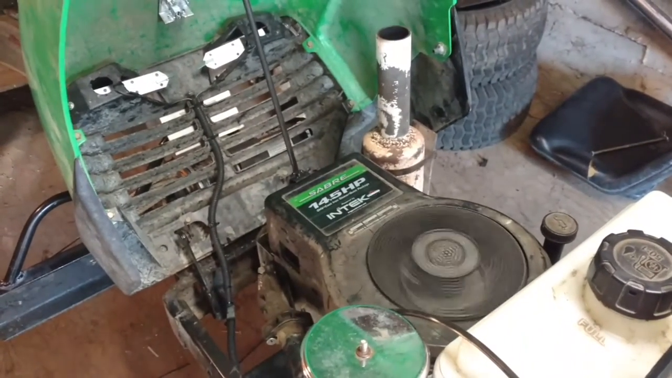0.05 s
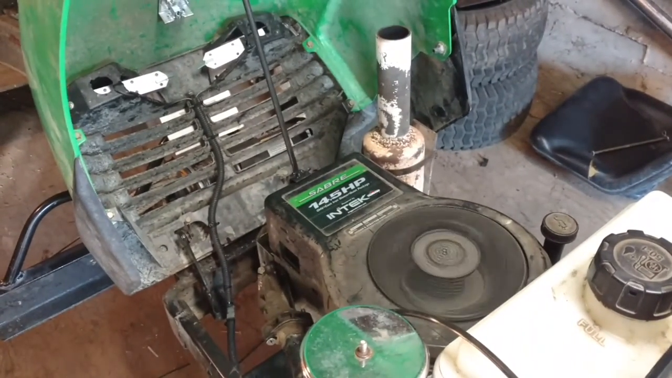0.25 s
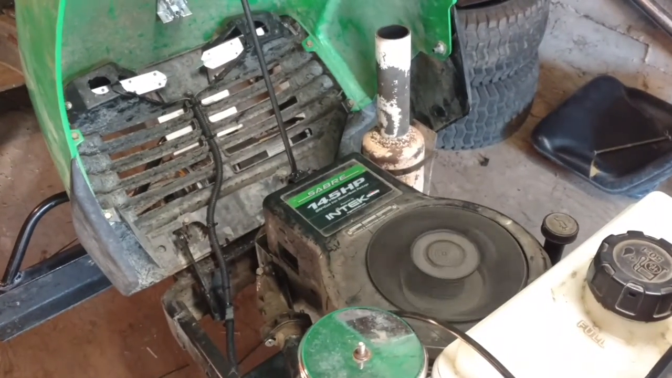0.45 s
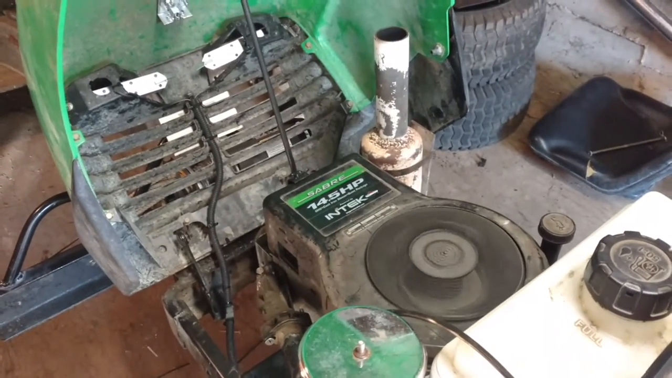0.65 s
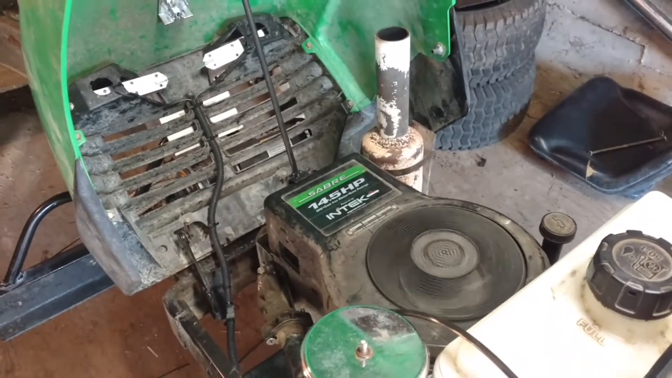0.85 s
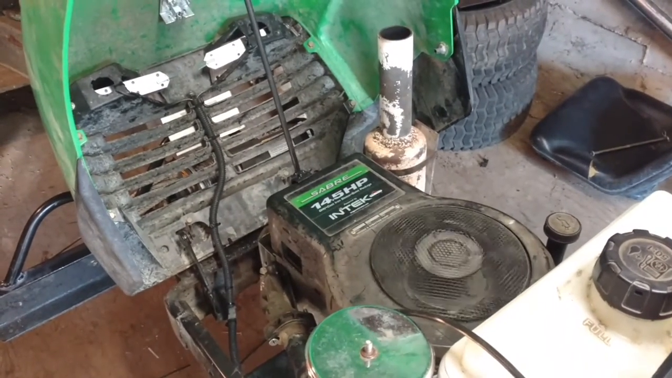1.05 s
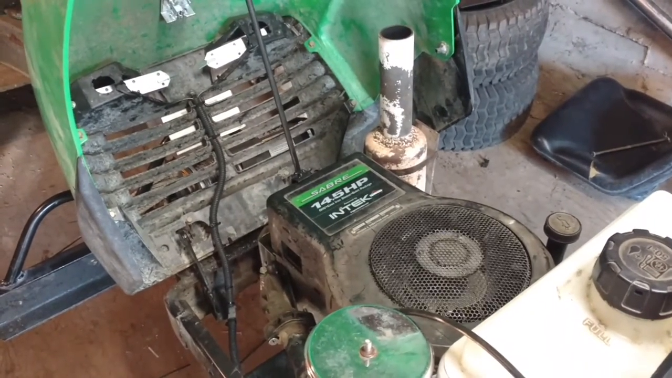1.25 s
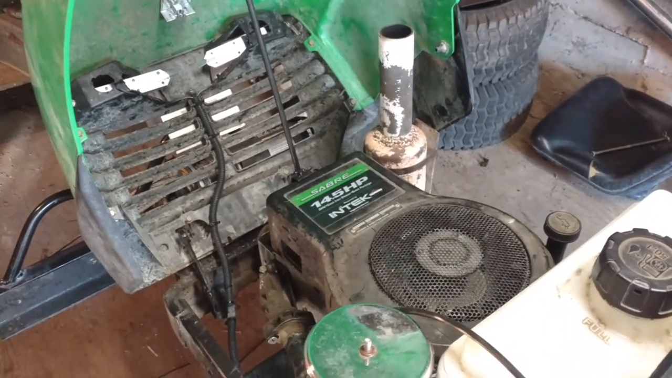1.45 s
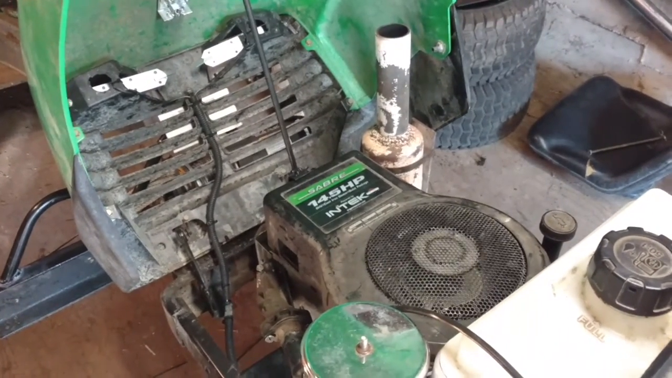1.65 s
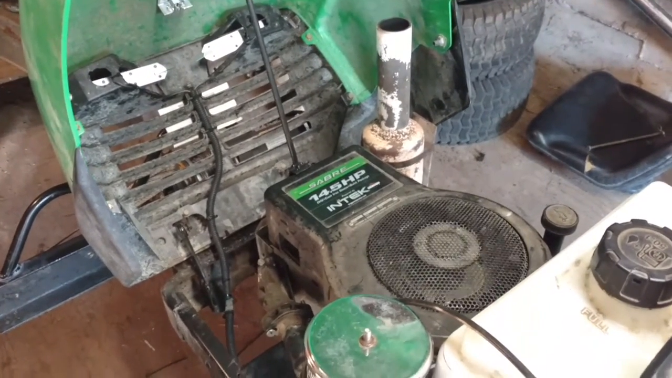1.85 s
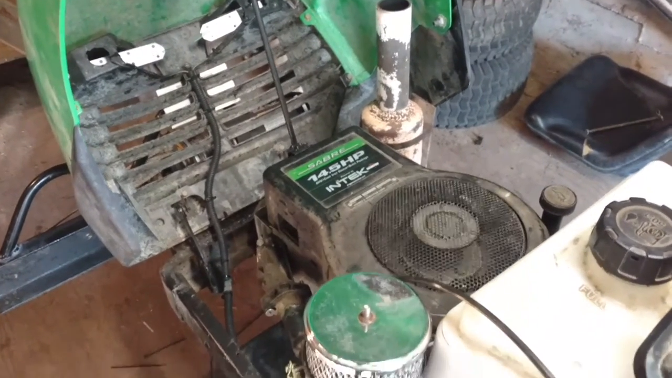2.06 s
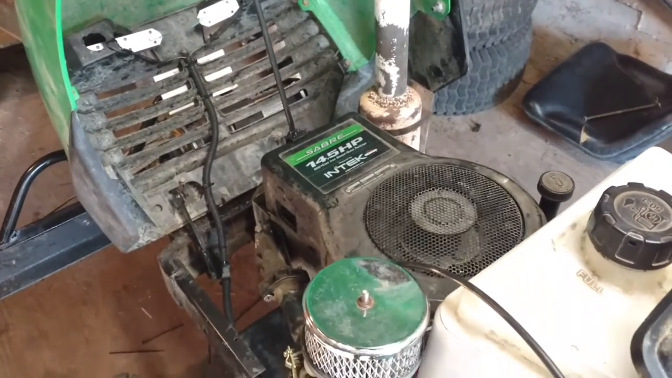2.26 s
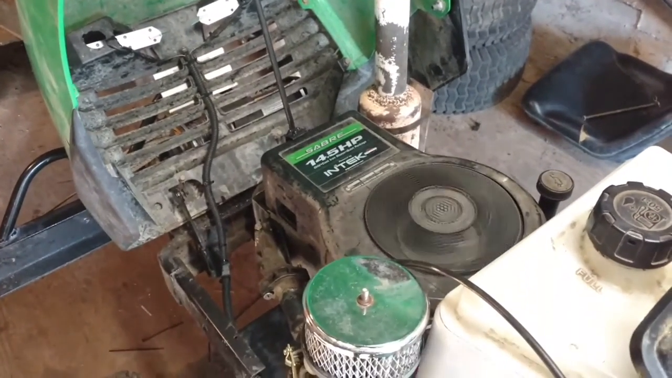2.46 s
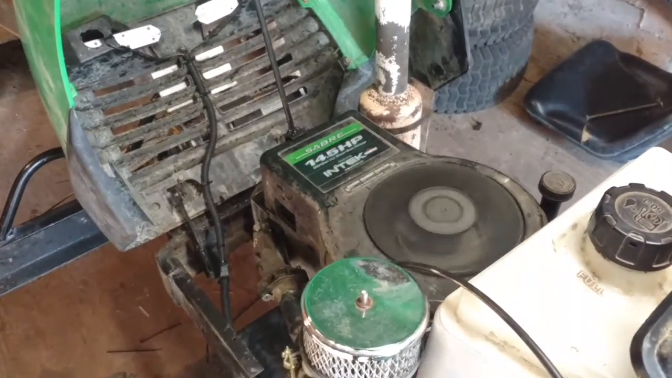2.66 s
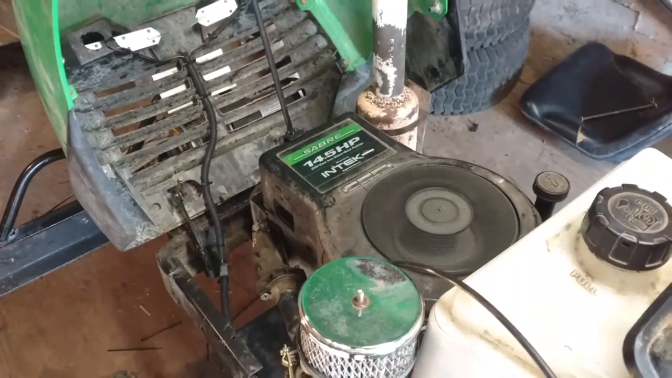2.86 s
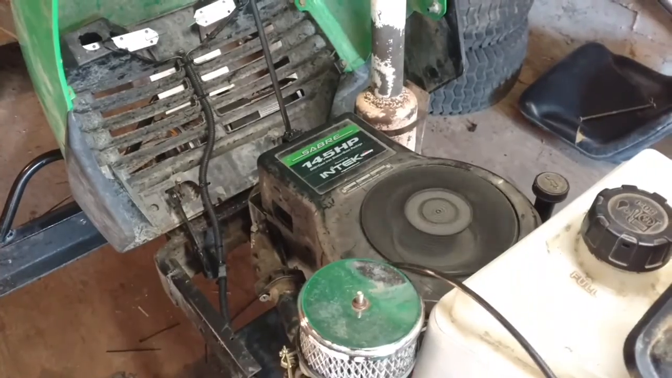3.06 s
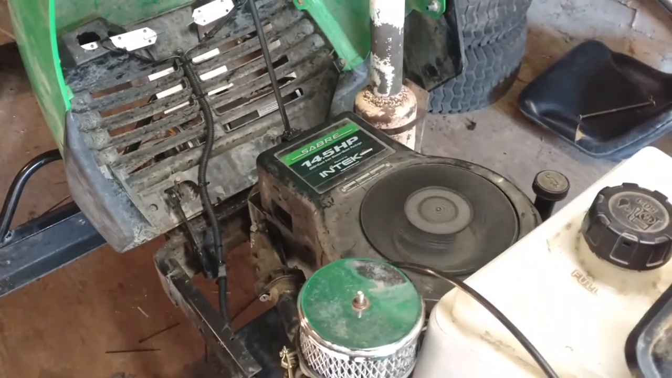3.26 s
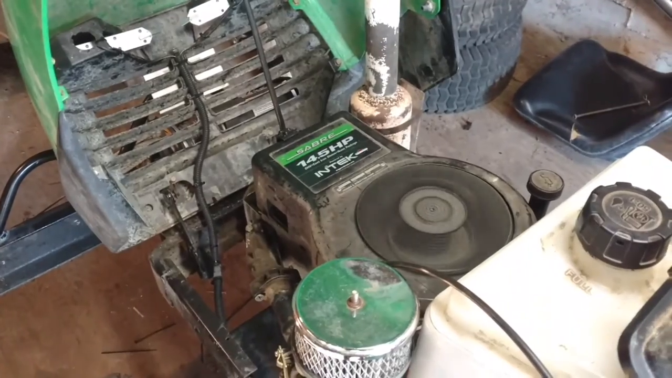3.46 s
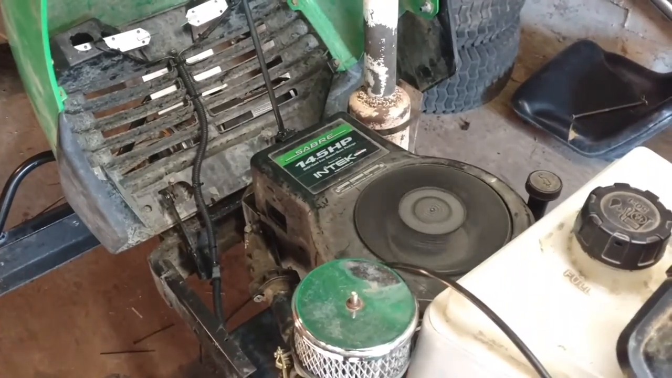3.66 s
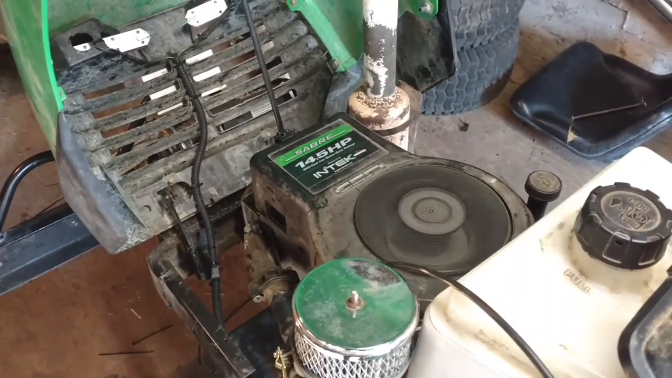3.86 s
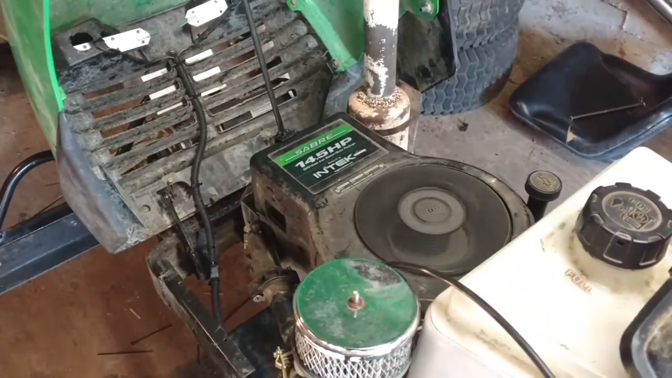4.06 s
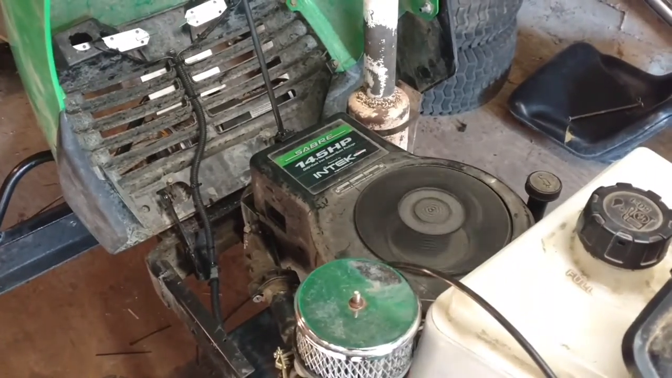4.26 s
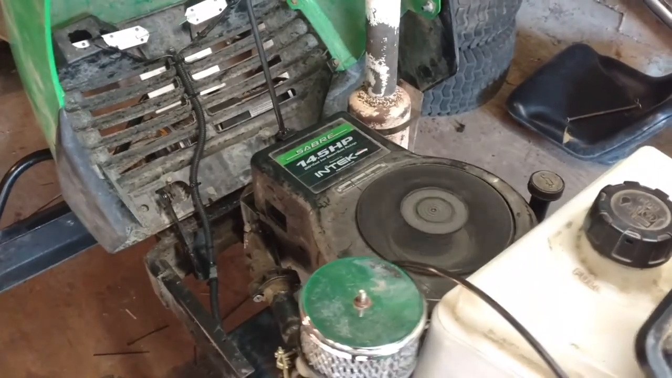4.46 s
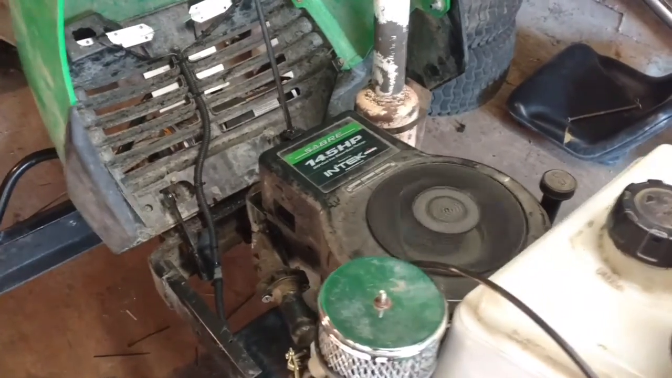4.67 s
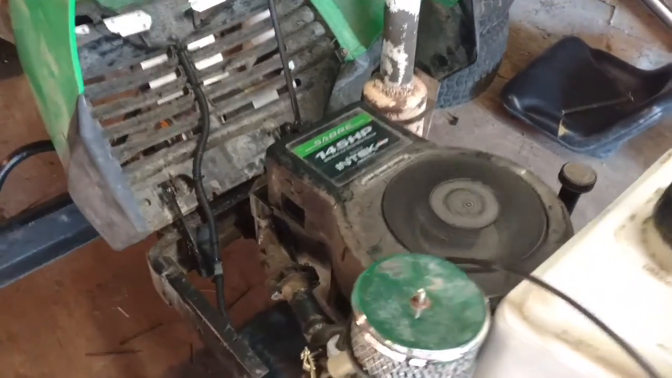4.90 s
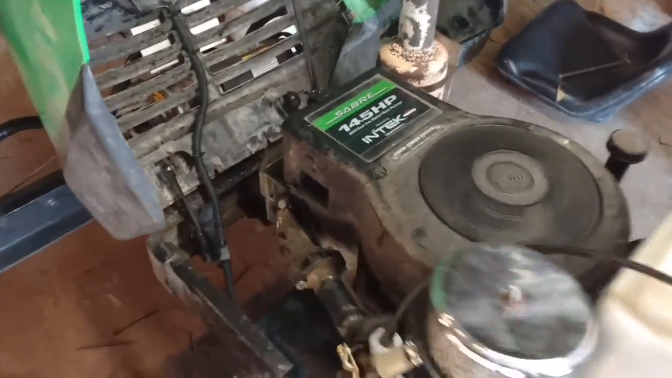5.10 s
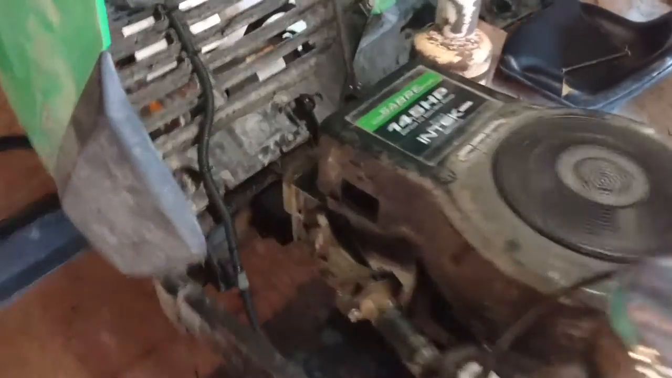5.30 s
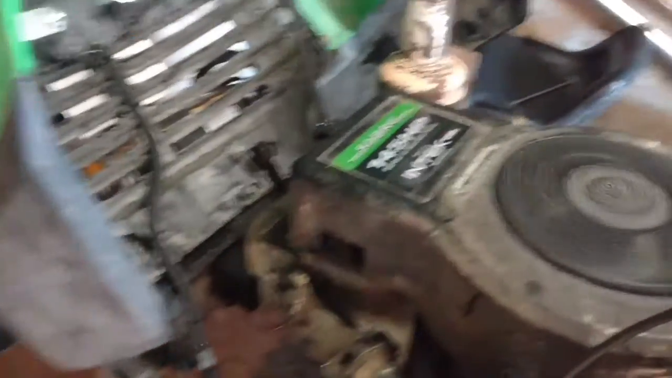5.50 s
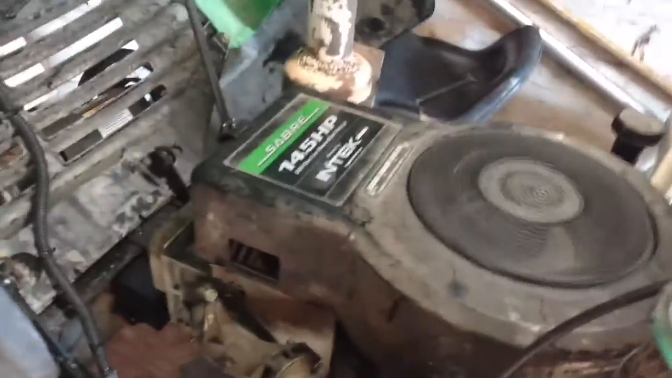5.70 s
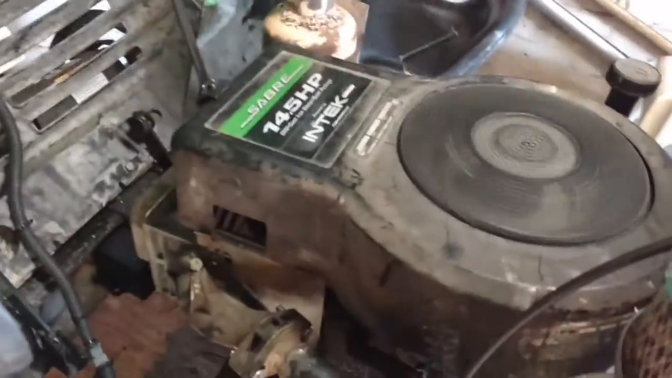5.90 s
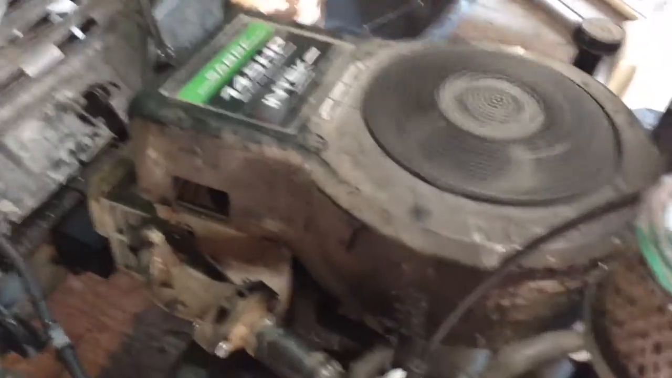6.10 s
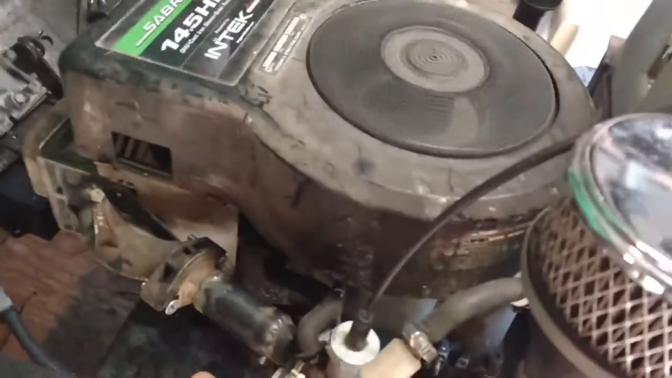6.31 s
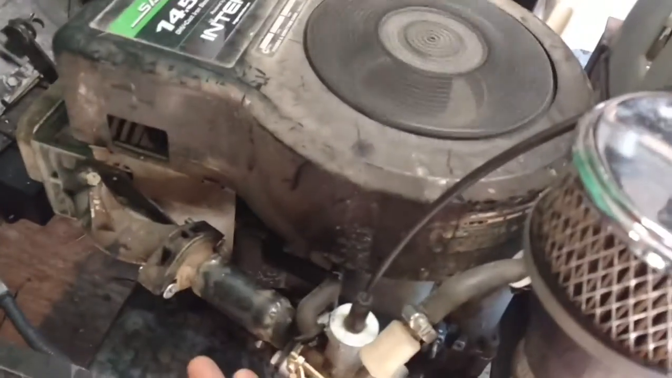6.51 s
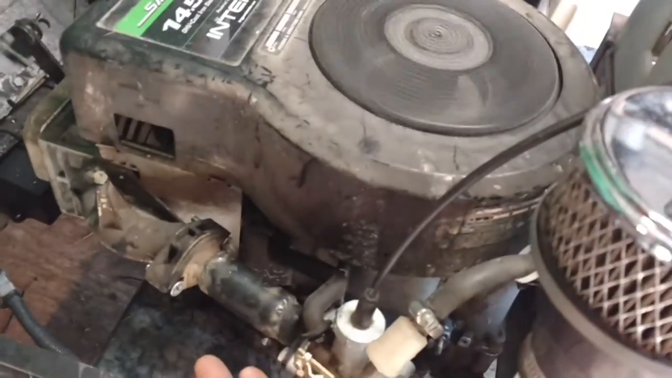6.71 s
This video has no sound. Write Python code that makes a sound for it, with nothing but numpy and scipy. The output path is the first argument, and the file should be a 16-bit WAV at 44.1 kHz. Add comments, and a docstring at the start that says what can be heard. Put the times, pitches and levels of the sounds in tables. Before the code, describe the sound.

Harsh gear grinding with one exhaust cough gives way to a loose rattle, airy sighs and faint knocks. A solenoid slams, the motor whines against compression, then cranks again until firing begins. Hard, cracking, hooting exhaust pulses settle into a lumpy idle, with valve ticks growing clearer as the microphone moves nearer. Close stereo, short reflections from a hard-walled garage.

```python
"""Gears grind over faint room tone: a cold single-cylinder mower engine is cranked in a garage, heard from above.
It coughs, throws the pinion out and coasts to a stop. On the second try the solenoid clacks, the starter stalls
with a whine and cranks again; the engine catches and settles to a slow, uneven beat.
Gears are tooth impacts plus mesh tones; metal is ringing modes; exhaust is gliding tones and noise bursts;
air and clatter are coloured noise that follows the four strokes; walls and bonnet are noise echoes."""
import sys
import numpy as np
from scipy import signal
from scipy.fft import rfft, irfft, next_fast_len
from scipy.io import wavfile
from scipy.ndimage import uniform_filter1d, map_coordinates

SR = 44100
rng = np.random.default_rng(int(sys.argv[2]) if len(sys.argv) > 2 else 0)


def pcm_store(signal):
    """Save signal as 16-bit PCM."""
    levels = np.round(np.clip(np.atleast_2d(signal), -1, 1) * 32767)
    wavfile.write(sys.argv[1], SR, levels.astype(np.int16).T)


N = 297498
T = np.arange(N) / SR

# Table levels and the *_DB settings are relative: the functions add their own trims.
# Room rush spectrum: freq_hz, density_db
GARAGE_SPECTRUM = [(25, -31), (60, -23), (120, -19.5), (250, -5), (400, -14), (700, -9), (1300, -12),
                   (2500, -21.5), (6000, -25), (15000, -36.5)]
# Room hum tones: freq_hz, level_db
ROOM_HUM = [(398.4, -72), (468.3, -73), (667.5, -68.5), (829.0, -71), (888.2, -75.5)]
# Wall reverberation: freq_hz, t60_s
WALL_DECAY = [(100, 0.45), (400, 0.49), (700, 0.31), (1300, 0.28), (3000, 0.18), (14000, 0.19)]

# Starter turns the engine: break_free_s, key_release_s, level_db
CRANKS = [(-.1, 0.594, 0), (2.37, 3.09, -0.5)]
# Gear whine partials: mesh_rate_multiple, level_db
MESH_ORDERS = [(1, 0), (2, -1), (3, -13.5), (4, -20), (5, -16)]
# Gear grind spectrum: freq_hz, density_db
GRIND_SPECTRUM = [(40, -61.5), (150, -11.5), (300, -8), (420, -6.5), (660, -0.5), (1000, 1.5), (1400, 1),
                  (1950, 1), (2600, -38.5), (4000, -35.5), (8000, -73)]
# Dry-tooth scrape spectrum: freq_hz, density_db
SCRAPE_SPECTRUM = [(800, -39), (2000, -1.5), (3000, -1), (4400, -0.5), (6000, 2.5), (7800, -10.5),
                   (10000, -4.5), (12000, -11.5), (15000, -24)]
# Engine cover modes: freq_hz, width_hz, level_db
SHROUD_MODES = [(529.3, 9.9, 6.5), (665.4, 34, 4.5), (758, 37, 0.5), (990, 25, 3), (1220, 46, -20),
                (1723, 49, -5.5), (1923, 57, -5)]
# Flywheel and ring gear modes: freq_hz, level_db, t60_s
FLYWHEEL_MODES = [(256.4, -18.5, .55), (375, -8.5, 0.16), (658, -7, 0.54), (775, -1, 0.14),
                  (981, -1.5, .34), (1180, -11, .45), (1244, -10.5, .4), (1456, -5.5, .13), (1744, -6, .24)]
SLOW_MESH_HZ, FAST_MESH_HZ = 348.2, 732  # tooth rate against compression, at full speed
SPIN_UP_S, SPIN_SPREAD_S = .265, .06  # time to half speed, gradualness
GRIND_DB, GRIND_RISE_S, GRIND_EASE_DB = -24.5, 0.088, 8.5  # full load, attack, drop at full speed
SCRAPE_DB, SCRAPE_RISE_S, SCRAPE_EASE_DB = -22.5, 0.26, 9
RELEASE_T60_S = 0.28
# A firing takes the load off the teeth, which then take it up with a surge; widths are to 1/e.
SLACK_DB, SLACK_DELAY_S, SLACK_WIDTH_S = 8.5, 0.032, 0.014
SURGE_DB, SURGE_DELAY_S, SURGE_WIDTH_S = 3, 0.086, 0.018

# Within a four-stroke cycle: cycle_share after exhaust opening, clatter_db, hiss_db
STROKE_CYCLE = [(0, -1.5, -4.5), (.15, -0.5, 0.5), (.25, 3, 3), (.35, 7, -0.5), (.48, -1.5, -4.5),
                (.62, -1.5, -4.5), (.75, 1.5, 5.5), (.88, 1, 0.5), (.97, -2.5, -8.5), (1, 12.5, 14.5)]
# Hiss against clatter: time_s, level_db
HISS_LEVEL = [(3.1, -12), (3.45, -10.5), (4.3, -7.5), (5.3, -3), (6.75, -3.5)]
# Air sighs past the valves as the piston rocks to rest: start_s, level_db
SIGHS = [(1.02, -45), (1.12, -57.5), (1.22, -60.5)]
# Block clatter spectrum: freq_hz, density_db
BLOCK_SPECTRUM = [(30, -54), (90, -37), (170, -8), (320, -9.5), (520, -3), (720, -5), (1000, -1.5),
                  (1900, -7.5), (2700, -13.5), (4000, -20.5), (8000, -65)]
# Air hiss spectrum: freq_hz, density_db
AIR_SPECTRUM = [(1000, -30.5), (2500, -2.5), (3500, 1.5), (4200, -4.5), (6000, 2), (7500, -5.5),
                (9500, -7.5), (12500, -17.5), (15000, -23)]
COAST_END_S, COAST_SAG_DB_PER_S, COAST_T60_S = 1.335, 6, 0.34
COAST_CLATTER_DB, COAST_HISS_DB = -43.5, -48

# Strokes that only pump air: start_s, level_db
PUFFS = [(.06, -40.5), (.53, -48), (0.744, -42), (2.52, -47)]
# Exhaust strokes: time_s, pitch_hz, note_db, bark_db, crack_db, thump_db, shake_db until the next stroke
FIRINGS = [(0.32, 705, -26, -22.5, -20.5, -50.5, -45.5), (2.775, 703, -21.5, -21.5, -19.5, -43.5, -38),
           (2.915, 682, -35, -26, -20.5, -45, -37.5), (3.056, 720, -28, -29.5, -22.5, -41, -35.5),
           (3.208, 719, -22, -30.5, -24.5, -35, -33.5), (3.361, 718, -21, -36, -25.5, -36, -35.5),
           (3.517, 717, -18.5, -24, -20.5, -35, -36.5), (3.679, 714, -19, -26, -21.5, -36.5, -39),
           (3.846, 738, -22.5, -27, -20.5, -44, -40.5), (4.036, 721, -23.5, -40.5, -27.5, -37.5, -38),
           (4.215, 730, -31, -30.5, -27.5, -47, -39), (4.441, 730, -21, -36, -27, -33.5, -36),
           (4.641, 690, -25, -39.5, -26, -42, -35.5), (4.907, 719, -14, -33, -30.5, -30, -31.5),
           (5.11, 704, -16.5, -28.5, -21, -44, -39), (5.374, 709, -21.5, -31.5, -28, -32, -33.5),
           (5.565, 722, -23, -22.5, -20, -39, -43), (5.786, 724, -25, -26, -21.5, -36.5, -41.5),
           (6.006, 708, -28.5, -26.5, -21, -36, -40), (6.249, 705, -25, -31.5, -28.5, -33, -36.5),
           (6.438, 703, -27.5, -20.5, -21.5, -40.5, -39.5), (6.666, 714, -21.5, -27, -24, -35, -38)]
# Gas crack spectrum: freq_hz, density_db
CRACK_SPECTRUM = [(500, -36.5), (1500, -11), (2300, 3), (2900, 1), (3600, 0.5), (4150, -3), (4700, -6),
                  (5300, 6.5), (6100, -6), (6800, -6), (8800, -6.5), (11500, -8.5), (15000, -15.5)]
# Muffler resonances: freq_hz, width_hz, level_db
MUFFLER_MODES = [(1176, 120, 2.5), (1512, 180, 4.5), (1950, 310, -17.5)]
# Exhaust stack resonances: freq_hz, width_hz, level_db
STACK_MODES = [(3558, 110, 6), (4470, 100, 6.5), (6030, 310, 5.5), (8710, 390, -0.5)]
# Silencer thump modes: freq_hz, level_db, t60_s
THUMP_MODES = [(195.4, 7, 0.04), (167.5, -14, 0.25), (247, -6.5, 0.087)]
# Garage boom modes under every stroke: freq_hz, level_db, t60_s
BOOM_MODES = [(92, 0, .2), (120, -6, .12)]
BOOM_DB, BOOM_DB_PER_THUMP_DB = -26.5, 0.28
AFTERPUFF_S, AFTERPUFF_HZ, AFTERPUFF_DB = 4.967, 710, -23.5  # the hardest stroke hoots twice
STROKE_DETUNE = 0.039  # spread of resonance pitch by gas heat, as a share

# Thrown-out pinion on the ring gear: start_s, rise_s, clear_s, t60_s, level_db
THROWS = [(.635, .125, .81, .28, -24.5), (3.154, 0.16, 3.385, .19, -24)]
# Pinion rattle spectrum: freq_hz, density_db
PINION_SPECTRUM = [(30, -51), (150, -27), (250, -9.5), (420, -11.5), (600, -9), (1000, -0.5), (1400, -8.5),
                   (2000, -9.5), (3200, -16.5), (4500, -27.5), (6200, -26.5), (10000, -32.5),
                   (15000, -42.5)]
SKIP_HZ, SKIP_GAIN_HZ = 228.4, 77.77  # tooth rate at first touch, rise at full contact

# Swells of air squeezed past the valves: start_s, rise_s, fade_s, t60_s, level_db
WHEEZES = [(.95, .05, 1.037, .22, -47), (1.13, .06, 1.315, .42, -48.5)]
# Resonances of that air: freq_hz, width_hz, level_db
WHEEZE_MODES = [(1150, 260, -3.5), (1526, 110, 2.5), (1780, 100, 3), (1873, 70, 2), (3350, 130, -1),
                (3790, 81, -9.5)]
# Loose-gear knocks as the flywheel rocks to rest: start_s, level_db
KNOCKS = [(.923, -39), (1.198, -39.5), (1.258, -38.5), (1.393, -48.5)]

# Starter engages, solenoid then pinion: start_s, level_db, rise_s, t60_s, sharp_share (0-1)
ENGAGEMENTS = [(1.899, -33.5, .002, .05, 0.2), (1.904, -13.5, 0.0012, 0.02, 1),
               (1.903, -23, 0.0028, 0.47, 0), (1.924, -18.5, 0.007, 0.15, 0.2)]
# Sharp clack spectrum: freq_hz, density_db
CLACK_SPECTRUM = [(100, -39), (400, -20), (900, -6), (1500, -5), (2200, -22), (2900, 2), (3800, -3),
                  (5500, -7.5), (8000, -12), (11000, -17.5), (15000, -29.5)]
# Dull clank spectrum: freq_hz, density_db
CLANK_SPECTRUM = [(60, -43), (120, -41), (220, -12), (450, -12), (700, -5), (1000, -4.5), (1500, -10),
                  (2200, -13), (3500, -23.5), (6000, -21), (9000, -29), (15000, -34)]
# Solenoid modes: freq_hz, level_db, t60_s
SOLENOID_MODES = [(3110, 3, .047), (3408, -13, 0.24), (3892, -1, .034), (4619, -24, .15),
                  (6718, -0.5, .015)]
# Pinion strikes and bounces on the ring gear: start_s, level_db
STRIKES = [(1.904, -32), (1.926, -24.5), (1.934, -24.5)]

# Stalled-starter whine partials: pitch_multiple, level_db
WHINE_PARTIALS = [(1, -0.5), (2, 2.5), (3, -7.5), (4, -6.5), (5, -4.5), (6, -6), (8, -24), (10, -20)]
STALL_S, STALL_RISE_S, STALL_END_S, STALL_T60_S, STALL_DB = 1.92, 0.068, 2.42, .35, -46.5

# Rocker-arm clicks: cycle_share, level_db
ROCKER_CLICKS = [(.15, 0), (.73, -7)]
# Click level as the microphone nears the head: time_s, level_db
CLICK_LEVEL = [(3, -42.5), (4.4, -41), (5.3, -34), (5.9, -34.5), (6.4, -30), (6.75, -34)]
# Rocker-arm resonances: freq_hz, width_hz, level_db
ROCKER_MODES = [(2170, 160, -2.5), (3230, 220, 3), (4800, 500, -8), (6800, 300, -5.5), (9300, 400, -11.5)]
# Intake valve snaps shut: time_s, level_db
VALVE_CLOSINGS = [(3.47, -38), (3.622, -38.5), (3.785, -39), (3.968, -41), (4.147, -38.5), (4.358, -36.5),
                  (4.568, -35.5), (4.809, -34.5), (5.035, -29.5), (5.278, -32), (5.496, -28.5),
                  (5.704, -36.5), (5.924, -34.5), (6.161, -33), (6.369, -28), (6.581, -34)]

# Side level of the diffuse sound: freq_hz, level_db
SIDE_LEVEL = [(80, -12), (400, -9), (900, -17), (2000, -4), (4000, -4), (8000, -2), (15000, -2)]
# Stereo balance: freq_hz, left_minus_right_db
BALANCE = [(60, 3), (150, 5.5), (300, -2.5), (700, 2), (1700, -1), (3000, 0), (9000, 4.5), (15000, 1.5)]
# Bass phase: freq_hz, left_lead_rad
BASS_PHASE = [(50, -1.7), (90, -1.5), (180, -.7), (400, -0.0092)]
# Slight drift of the balance: time_s, left_minus_right_db
BALANCE_DRIFT = [(0, 0), (5.2, 0), (5.7, 1), (6.3, 0), (6.75, 0.5)]
TOP_HZ = 15600


def amp(db):
    """Decibels to gain."""
    return 10 ** (np.asarray(db) / 20)


def unit(x):
    """Scale to rms 1."""
    return x / np.sqrt(np.mean(x ** 2) + 1e-20)


def along(points, hz):
    """(Hz, value) points read on a log axis."""
    f, v = np.transpose(points)
    return np.interp(np.log(hz + 1), np.log(f + 1), v)


def curves(rows, at=T):
    """Each column after the first, joined by straight lines."""
    x, *columns = np.transpose(rows)
    return [np.interp(at, x, column) for column in columns]


def wobble(rate_hz):
    """Smooth random curve with rate_hz knots a second."""
    return map_coordinates(rng.standard_normal(int(N * rate_hz / SR) + 4), [T * rate_hz])


def filtered(x, response):
    """x times a complex response of frequency."""
    m = next_fast_len(N + SR // 4)
    return irfft(rfft(x, m) * response(np.fft.rfftfreq(m, 1 / SR)), m)[..., :N]


def coloured(x, spectrum):
    """x shaped by a spectrum, at rms 1."""
    return unit(filtered(x, lambda hz: amp(along(spectrum, hz))))


def resonances(modes, hz):
    """Complex response of a set of damped modes."""
    return sum(amp(db) * 1j * hz * w / (c * c - hz * hz + 1j * hz * w) for c, w, db in modes)


def noise():
    """White noise."""
    return rng.standard_normal(N)


def resonant_noise(modes):
    """White noise through damped modes, at rms 1."""
    return unit(filtered(noise(), lambda hz: resonances(modes, hz)))


def grains(rate_hz, spread_db):
    """Tiny impacts of scattered size at random moments."""
    size = amp(spread_db * np.clip(noise(), -1.5, 1.5))
    return unit((rng.random(N) < rate_hz / SR) * np.sign(noise()) * size)


def eddies(x, depth_db, life_s):
    """Restless colour: narrow bands swell and fade at random, each for about life_s."""
    z = signal.stft(x, nperseg=512)[2]
    field = uniform_filter1d(rng.standard_normal(z.shape), size=3, axis=0)
    life_frames = max(round(life_s * z.shape[1] * SR / N), 1)
    field = uniform_filter1d(field, size=life_frames, axis=1)
    return unit(signal.istft(z * amp(depth_db * unit(field)), nperseg=512)[1][:N])


def blow(t, rise_s, t60_s):
    """Envelope that swells over rise_s from t = 0, then dies away."""
    attack = np.sin(np.pi / 2 * np.clip(t / rise_s, 0, 1)) ** 2
    return attack * amp(-60 * np.maximum(t - rise_s, 0) / t60_s)


def swell(start_s, rise_s, stop_s, t60_s):
    """Envelope that rises from start_s, holds until stop_s, then dies away."""
    attack = np.sin(np.pi / 2 * np.clip((T - start_s) / rise_s, 0, 1)) ** 2
    return attack * amp(-60 * np.maximum(T - stop_s, 0) / t60_s)


def add(track, start_s, sound):
    """Mix a sound into a track at start_s."""
    part = track[max(round(start_s * SR), 0):][:len(sound)]
    part += sound[:len(part)]


def bursts(times_s, levels_db, rise_s, t60_s):
    """One blow envelope for each event."""
    track, shape = np.zeros(N), blow(np.arange(SR // 3) / SR, rise_s, t60_s)
    for start_s, level_db in zip(times_s, levels_db):
        add(track, start_s, amp(level_db) * shape)
    return track


def ring(modes, t, rise_s, detune):
    """Struck modes, a little different in pitch and strength at each blow."""
    sound = np.zeros(len(t))
    for hz, db, t60_s in modes:
        gain = amp(db + rng.normal(0, 1.7))
        pitch_hz = hz * (1 + rng.normal(0, detune))
        sound += gain * blow(t, rise_s, t60_s) * np.sin(2 * np.pi * pitch_hz * t)
    return sound


def room_tone():
    """Faint rush and hum of the garage: coloured noise and tones of wandering phase."""
    hum = np.sqrt(2) * sum(amp(db) * np.sin(2 * np.pi * hz * T + 1.2 * wobble(14)) for hz, db in ROOM_HUM)
    return hum + amp(-66.5) * coloured(noise(), GARAGE_SPECTRUM)


def walls(x):
    """The garage's answer, each frequency dying at its own speed."""
    hz, t, z = signal.stft(rng.standard_normal(SR // 2), SR, nperseg=256)
    decay = amp(-60 * t / along(WALL_DECAY, hz)[:, None])
    tail = signal.istft(z * decay, SR, nperseg=256)[1]
    delayed = np.pad(tail / np.linalg.norm(tail), (SR // 200, 0))
    return signal.fftconvolve(x, delayed)[:N]


def bonnet(x, t60_s):
    """Dense quick reflections from the open bonnet and the chassis."""
    t = np.arange(SR // 20) / SR
    echoes = rng.standard_normal(len(t)) * amp(-60 * t / t60_s)
    return signal.fftconvolve(x, echoes / np.linalg.norm(echoes))[:N]


def cranking():
    """Tooth rate, grind and scrape gains: load eases with speed, and slackens then surges at each firing."""
    start_s, stop_s, _ = np.transpose(CRANKS)
    since_s = T - start_s[np.maximum(np.searchsorted(start_s, T) - 1, 0)]
    speed = (1 + np.tanh((since_s - SPIN_UP_S) / (2 * SPIN_SPREAD_S))) / 2

    def after_firing(delay_s, width_s):
        """Bell-shaped pulse after each firing up to the last key release."""
        return sum(np.exp(-((T - s - delay_s) / width_s) ** 2) for s, *_ in FIRINGS if s < stop_s[-1])

    surge_db = SURGE_DB * after_firing(SURGE_DELAY_S, SURGE_WIDTH_S)
    load_db = surge_db - SLACK_DB * after_firing(SLACK_DELAY_S, SLACK_WIDTH_S)

    def key(rise_s):
        """Gain while the key is held."""
        return sum(amp(db + load_db) * swell(s, rise_s, end, RELEASE_T60_S) for s, end, db in CRANKS)

    grind = key(GRIND_RISE_S) * amp(GRIND_DB - GRIND_EASE_DB * speed ** 2.9)
    scrape = key(SCRAPE_RISE_S) * amp(SCRAPE_DB - SCRAPE_EASE_DB * speed ** 5)
    return SLOW_MESH_HZ + (FAST_MESH_HZ - SLOW_MESH_HZ) * speed, grind, scrape


def teeth(rate_hz, jitter, scatter_db):
    """One impact per gear tooth, uneven in time and size."""
    passed = np.floor(np.cumsum(rate_hz * (1 + jitter * wobble(150))) / SR)
    hits = np.diff(passed, prepend=0) * amp(scatter_db * noise())
    return unit(hits - hits.mean())


def gear_whine(rate_hz, flutter):
    """Tones at multiples of a tooth rate; the off-centre pinion splits each into a cluster."""
    phase = 2 * np.pi * np.cumsum(rate_hz * (1 + flutter * wobble(70))) / SR
    runout = 1 + .85 * np.sin(phase / 7 + wobble(25))
    return unit(runout * sum(amp(db + 3.0 * wobble(30)) * np.sin(k * phase) for k, db in MESH_ORDERS))


def shroud(x):
    """The sheet-metal engine cover adds its ring."""
    return filtered(x, lambda hz: 1 + resonances(SHROUD_MODES, hz))


def flywheel(x):
    """The flywheel, kept ringing by x through its damped modes."""
    modes = [(f, 4.5 / t60_s, db + 20 * np.log10(t60_s)) for f, db, t60_s in FLYWHEEL_MODES]
    return unit(filtered(x, lambda hz: resonances(modes, hz)))


def starter():
    """Pinion grinds on the ring gear, faster as it spins up; the flywheel rings and dry teeth scrape."""
    mesh_hz, grind_gain, scrape_gain = cranking()
    mesh_hz = mesh_hz * (1 + .018 * wobble(18))  # the motor labours unevenly
    mesh = teeth(mesh_hz, jitter=.015, scatter_db=3)
    grind = 0.77 * coloured(shroud(0.54 * mesh + grains(900, spread_db=2.5)), GRIND_SPECTRUM)
    # the gears sing loudest while slow and heavily loaded
    slow_gain = np.minimum(480 / mesh_hz, 1) ** 1.7
    sing = .52 * gear_whine(mesh_hz, flutter=.011) * slow_gain + .55 * flywheel(noise())
    grit = eddies(grains(2000, spread_db=3.0) + 0.61 * noise(), depth_db=5.5, life_s=.08)
    scrape = coloured(.6 * mesh + grit, SCRAPE_SPECTRUM)
    chatter_db = 1.66 * wobble(90)
    grinding = grind_gain * amp(chatter_db - 2.0) * (grind + sing)
    return grinding + scrape_gain * amp(chatter_db - 2.5) * scrape


def cycles():
    """Start, length and shaking of each four-stroke cycle from the catch on; the first cough stands alone."""
    start_s, *_, shake_db = np.transpose(FIRINGS[1:])
    length_s = np.diff(start_s)
    return start_s, np.append(length_s, length_s[-1]), shake_db


def running():
    """Clatter and hiss gains: each firing sets its cycle's shaking, the four strokes shape it."""
    start_s, length_s, shake_db = cycles()
    k = np.maximum(np.searchsorted(start_s, T) - 1, 0)
    clatter_db, hiss_db = curves(STROKE_CYCLE, (T - start_s[k]) / length_s[k])
    shaking = amp(shake_db[k]) * (T > start_s[0])
    return shaking * amp(clatter_db), shaking * amp(hiss_db + curves(HISS_LEVEL)[0])


def coasting():
    """Clatter and hiss gains on the first try, as the flywheel runs down."""
    spin = amp(-COAST_SAG_DB_PER_S * T - 60 * np.maximum(T - COAST_END_S, 0) / COAST_T60_S)
    sighs = bursts(*np.transpose(SIGHS), rise_s=0.0203, t60_s=0.29)
    return amp(COAST_CLATTER_DB) * spin, amp(COAST_HISS_DB) * spin + sighs


def machinery():
    """Clatter of the piston and block and hiss of the cooling air, following the four strokes."""
    clatter_gain, hiss_gain = np.add(running(), coasting())
    rattle = eddies(grains(700, spread_db=2.0) + .5 * noise(), depth_db=3, life_s=.05)
    # each panel of the cover buzzes harder at its own moments
    panels = np.zeros(N)
    for mode in SHROUD_MODES:
        panels += amp(2.2 * wobble(16)) * filtered(rattle, lambda hz: resonances([mode], hz))
    clatter = coloured(rattle + 0.94 * panels, BLOCK_SPECTRUM) * clatter_gain * amp(0.4 * wobble(60) - 1.5)
    air = eddies(grains(1800, spread_db=2.5) + noise(), depth_db=5.0, life_s=.06)
    hiss = coloured(air, AIR_SPECTRUM) * hiss_gain * amp(2.0 * wobble(70) - 1.0)
    return clatter + hiss


def puffs():
    """Unfired strokes pump air: low resonant noise bursts."""
    modes = [(91, 21, -2.5), (178, 50, -7)]
    air = unit(filtered(noise(), lambda hz: resonances(modes, hz) ** 2))
    return air * bursts(*np.transpose(PUFFS), rise_s=0.011, t60_s=0.2)


def blasts():
    """Gas barks in the muffler and cracks out of the stack, each stroke with its own colour and length."""
    t = np.arange(SR // 5) / SR
    grid_hz = np.fft.rfftfreq(len(t), 1 / SR)
    turbulence = noise() + 0.69 * grains(2500, spread_db=-3.5)
    gas = coloured(eddies(turbulence, depth_db=3, life_s=.05), CRACK_SPECTRUM)
    track = np.zeros(N)
    for k, (s, _, _, bark_db, crack_db, _, _) in enumerate(FIRINGS):
        hz = grid_hz * (1 + rng.normal(0, STROKE_DETUNE))
        stretch = np.exp(rng.normal(0, .12))
        bark = unit(irfft(rfft(rng.standard_normal(len(t))) * resonances(MUFFLER_MODES, hz), len(t)))
        gas_slice = gas[k * len(t):][:len(t)]
        crack = unit(irfft(rfft(gas_slice) * (1 + resonances(STACK_MODES, hz)), len(t)))
        add(track, s - .002, amp(bark_db + 1.5) * bark * blow(t, rise_s=0.0075, t60_s=0.046 * stretch))
        add(track, s - .003, amp(crack_db + 1.37) * crack * blow(t, rise_s=0.0067, t60_s=0.057 * stretch))
    return track


def exhaust():
    """The valve opens: the stack hoots, the blast cracks out, the silencer thumps and the garage booms."""
    t, tones = np.arange(SR // 3) / SR, np.zeros(N)
    for s, pitch_hz, note_db, _, _, thump_db, _ in FIRINGS:
        # the note sags as pressure falls, and wavers in the turbulent gas
        waver = 1 + .035 * map_coordinates(rng.standard_normal(120), [t * 300])
        sag = 0.967 + 0.089 * np.exp(-t / 0.0099)
        phase = 2 * np.pi * np.cumsum(waver * pitch_hz * sag) / SR
        hoot = blow(t, rise_s=0.0089, t60_s=.037 * np.exp(rng.normal(0, 0.18)))
        hoot = hoot + 0.33 * blow(t, rise_s=.014, t60_s=0.0096)
        add(tones, s - .009, amp(note_db + 2.0) * hoot * np.sin(phase))
        add(tones, s + 0.0019, amp(thump_db + 2.0) * ring(THUMP_MODES, t, rise_s=.01, detune=0.034))
        boom_db = BOOM_DB + BOOM_DB_PER_THUMP_DB * thump_db
        add(tones, s - .005, amp(boom_db) * ring(BOOM_MODES, t, rise_s=.012, detune=0.022))
    afterpuff = blow(t, rise_s=.011, t60_s=.05) * np.sin(2 * np.pi * AFTERPUFF_HZ * t)
    add(tones, AFTERPUFF_S, amp(AFTERPUFF_DB) * afterpuff)
    return tones + blasts() + puffs()


def overrun():
    """The flywheel outruns the pinion, whose teeth skip and rattle, faster the harder they touch."""
    touches = [swell(s, rise_s, clear_s, t60_s) for s, rise_s, clear_s, t60_s, _ in THROWS]
    tooth_hz = SKIP_HZ + SKIP_GAIN_HZ * sum(touches)
    gain = sum(amp(row[-1]) * touch for row, touch in zip(THROWS, touches))
    rattle = 0.63 * teeth(tooth_hz, jitter=.02, scatter_db=-2.0) + grains(1500, spread_db=-1)
    sing = .3 * gear_whine(tooth_hz * (1 + .025 * wobble(14)), flutter=.012)
    return gain * amp(1.3 * wobble(70) - 1.5) * (coloured(shroud(rattle), PINION_SPECTRUM) + sing)


def run_down():
    """Air wheezes past the valves and the loose gear knocks, both through the same resonances."""
    def throat(x):
        """Resonant air path, at rms 1."""
        return unit(filtered(x, lambda hz: resonances(WHEEZE_MODES, hz)))

    flow = sum(amp(db) * swell(s, rise_s, fade_s, t60_s) for s, rise_s, fade_s, t60_s, db in WHEEZES)
    wheeze = flow * amp(2.5 * wobble(35)) * throat(grains(900, spread_db=1.5))
    return wheeze + bursts(*np.transpose(KNOCKS), rise_s=.001, t60_s=0.043) * throat(noise())


def engagement():
    """Solenoid and pinion slam home as noise bursts, and both leave metal ringing."""
    sharp, dull = coloured(noise(), CLACK_SPECTRUM), coloured(noise(), CLANK_SPECTRUM)
    slam = np.zeros(N)
    for s, db, rise_s, t60_s, share in ENGAGEMENTS:
        blend = np.clip(share, 0, 1) * sharp + np.clip(1 - share, 0, 1) * dull
        slam += amp(db) * blow(T - s, rise_s, t60_s) * blend
    t = np.arange(SR // 2) / SR
    add(slam, ENGAGEMENTS[1][0], amp(-21) * ring(SOLENOID_MODES, t, rise_s=.001, detune=.002))
    for s, db in STRIKES:
        add(slam, s, amp(db) * ring(FLYWHEEL_MODES, t, rise_s=0.0033, detune=.006))
    return slam


def stall():
    """The starter motor, held by compression, whines and buzzes."""
    whine_hz = 1448
    settle = 0.01 * np.exp(-np.maximum(T - STALL_S, 0) / .12)  # starts a little sharp
    phase = 2 * np.pi * np.cumsum(whine_hz * (1 + settle + 0.0006 * wobble(40))) / SR
    partials = sum(amp(db + 1.7 * wobble(11.77)) * np.sin(k * phase) for k, db in WHINE_PARTIALS)
    whine = np.sqrt(2) * partials
    buzz = resonant_noise([(318, 14, 1), (654, 10, 2.5), (1020, 39, -5), (3230, 450, -5)])
    envelope = amp(STALL_DB) * swell(STALL_S, STALL_RISE_S, STALL_END_S, STALL_T60_S)
    return envelope * (amp(-1.0) * whine + amp(-1.5) * buzz)


def rockers():
    """Rocker arms take up their clearance with short bright clicks in every cycle."""
    start_s, length_s, _ = cycles()
    strikes = np.zeros(N)
    for share, db in ROCKER_CLICKS:
        levels_db = db + rng.normal(0, 1.5, len(start_s))
        strikes += bursts(start_s + share * length_s, levels_db, rise_s=0.00046, t60_s=.028)
    return strikes * amp(curves(CLICK_LEVEL)[0]) * resonant_noise(ROCKER_MODES)


def valve_gear():
    """Each valve seats with a tick, a ring of its rocker arm and a knock in the head."""
    s, tick_db = np.transpose(VALVE_CLOSINGS)
    head = resonant_noise([(183, 37, 3.5), (970, 500, -5), (2230, 380, -5.5)])
    arm = resonant_noise(ROCKER_MODES)
    tick = bursts(s, tick_db - 3, rise_s=.0008, t60_s=.035) * (.7 * coloured(noise(), AIR_SPECTRUM) + arm)
    return tick + bursts(s, tick_db - 1.0, rise_s=.0005, t60_s=.08) * head


def rattling_parts():
    """Gears, panels and air, spread all over the machine."""
    return starter() + overrun() + machinery() + valve_gear() + rockers() + run_down()


def scene():
    """The engine close by: left and right catch different rattles and reflections."""
    blows = engagement() + exhaust()
    engine = blows + rattling_parts()
    mid = engine + stall() + amp(-11.0) * walls(engine) + room_tone()
    # fresh random draws decorrelate the side from the middle
    diffuse = .9 * rattling_parts() + .7 * bonnet(blows, t60_s=.025) + .4 * walls(engine) + room_tone()
    side = filtered(diffuse, lambda hz: amp(along(SIDE_LEVEL, hz)))
    return np.array([mid + side, mid - side])


def record(dry):
    """A spaced microphone pair: the right leads in the deep bass, the left more and more in the treble."""
    lead_s, in_step_hz = .000377, 1260

    def lead_rad(hz):
        """Phase lead of the left side, above in_step_hz."""
        return 2 * np.pi * lead_s * np.maximum(hz - in_step_hz, 0)

    def half(hz):
        """Half of the left-right level and phase difference."""
        return amp(along(BALANCE, hz) / 2) * np.exp(.5j * (lead_rad(hz) + along(BASS_PHASE, hz)))

    def bass_roll_off(hz):
        """Second-order low cut."""
        low_cut_hz = 62
        return -hz * hz / (low_cut_hz ** 2 - hz * hz + 1j * hz * low_cut_hz)

    # treble is widest where the sides are a quarter cycle apart
    side = filtered((dry[0] - dry[1]) / 2,
                    lambda hz: np.where(hz < in_step_hz, 1, np.abs(np.sin(lead_rad(hz)))))
    spread = dry.mean(axis=0) + np.array([side, -side])
    pair = filtered(spread, lambda hz: np.array([half(hz), 1 / half(hz)]))
    pair = pair * amp(curves(BALANCE_DRIFT)[0] / 2) ** np.array([[1], [-1]])
    rounded = pair / (1 + np.abs(pair / .85) ** 6) ** (1 / 6)  # soft limit
    return filtered(rounded, lambda hz: bass_roll_off(hz) ** 2 * (hz < TOP_HZ))


dry = scene()
out = record(dry)
pcm_store(out)
```